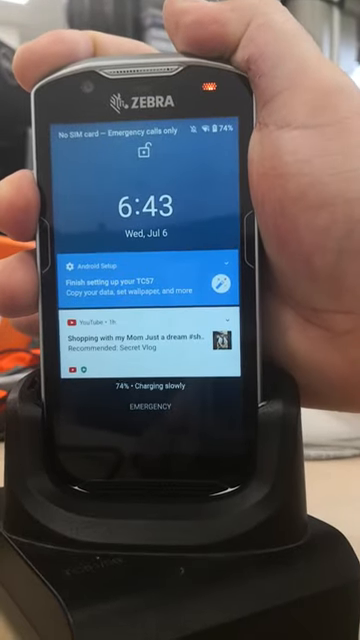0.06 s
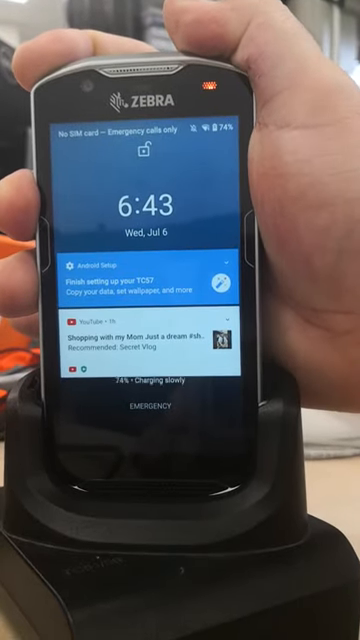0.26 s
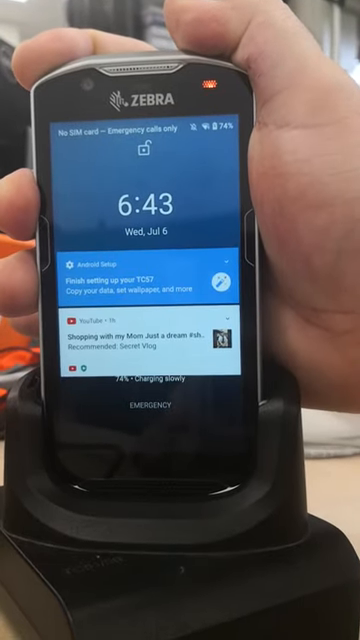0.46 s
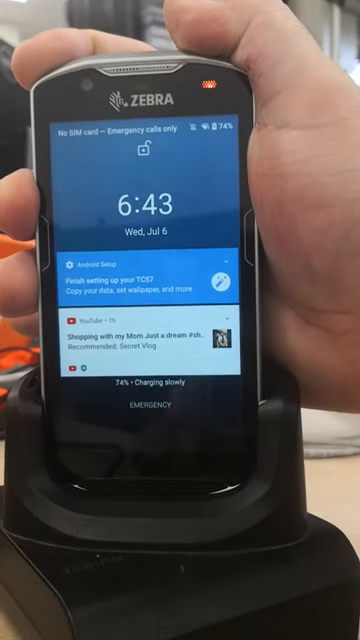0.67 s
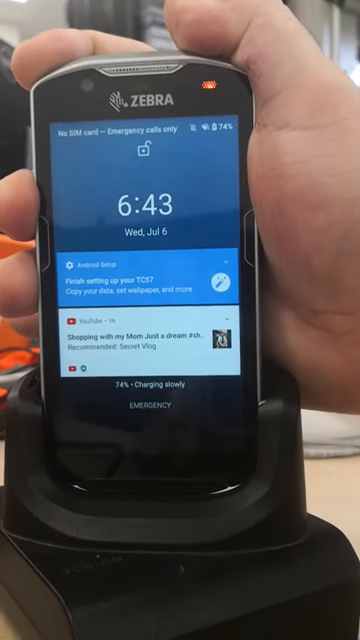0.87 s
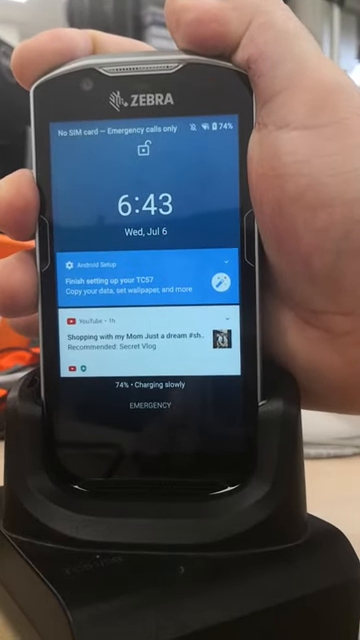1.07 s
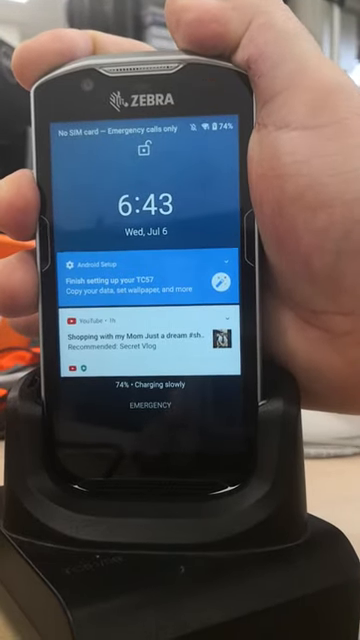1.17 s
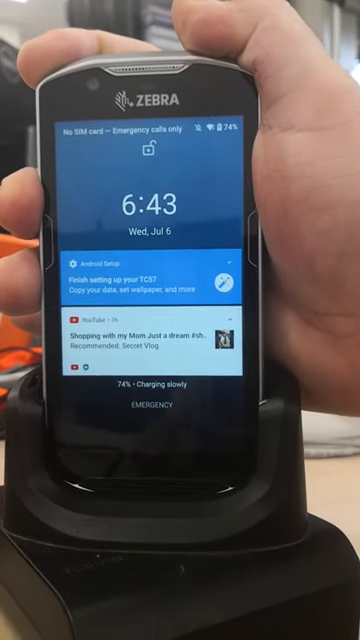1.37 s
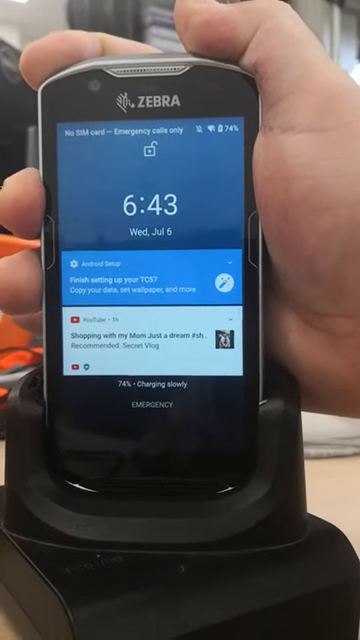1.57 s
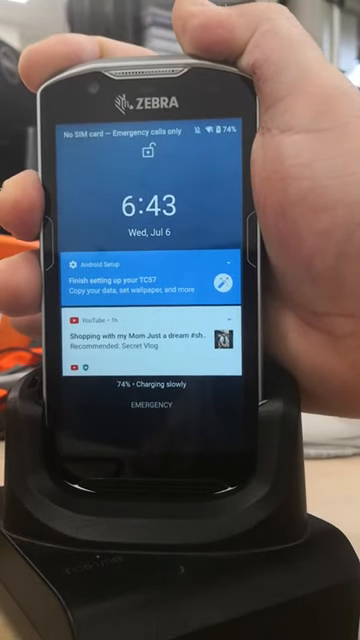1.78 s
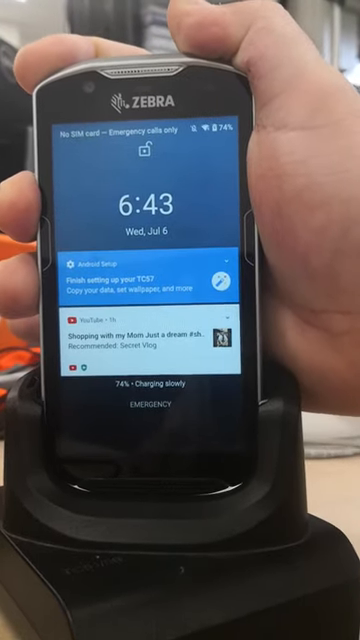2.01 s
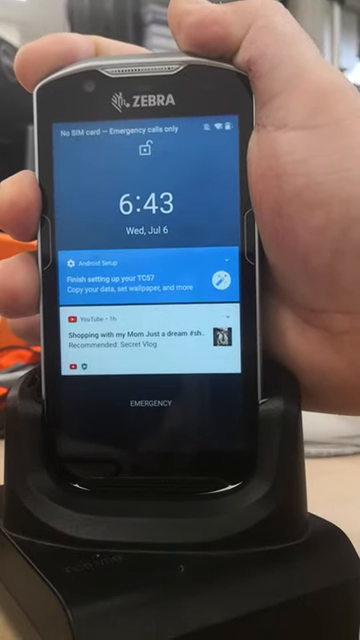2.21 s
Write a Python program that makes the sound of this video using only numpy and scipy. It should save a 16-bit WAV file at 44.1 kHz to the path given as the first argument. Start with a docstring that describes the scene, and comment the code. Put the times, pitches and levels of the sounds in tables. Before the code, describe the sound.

A phone vibrates once with a short, bright buzz in a quiet room.

```python
"""A quiet room, the microphone close to a phone in its desk cradle. The phone vibrates once.
The motor's off-centre weight spins up and shakes the body into a hum; at speed the case knocks once a
turn and rings as a bright buzz, over fluttering low overtones. A tiny tick follows. The phone sits
to the right in the stereo image; behind it, ventilation and mains hum go on."""
import sys
import numpy as np
from scipy import signal
from scipy.fft import rfft, irfft
from scipy.io import wavfile

SR = 44100
rng = np.random.default_rng(int(sys.argv[2]) if len(sys.argv) > 2 else 0)


def output_pcm(signal):
    """Save a mono or channel-first signal as 16-bit PCM at the path in sys.argv[1].

    Samples are clipped to [-1, 1] before scaling.
    """
    pcm = np.clip(np.atleast_2d(signal).T, -1, 1) * 32767
    wavfile.write(sys.argv[1], SR, np.round(pcm).astype(np.int16))


N = 99225
T = np.arange(N) / SR
FFT_SIZE = 2 ** 17
FREQ = np.arange(FFT_SIZE // 2 + 1) * SR / FFT_SIZE


def body_hum(turns):
    """The spinning weight rocks the phone in a near sine; a low mode of the desk rings on after it."""
    # shaking of the body (time [s], level [dB])
    shaking = [(.165, -89), (.187, -59), (.208, -39.5), (.222, -36.5), (.257, -36), (.275, -40.5),
               (.39, -34.5), (.6, -34.5), (.788, -34), (.795, -42.5), (.803, -74.5)]
    waver_db, waver_hz = 0.45, 59.6
    desk_hz, desk_t60_s, desk_db = 218.9, 0.38, -19.5
    waver = shape(rng.standard_normal(N), 1 / (1 + (FREQ / waver_hz) ** 2))
    hum = np.sqrt(2) * np.sin(2 * np.pi * turns) * envelope(shaking)
    hum *= undb(waver_db * waver / waver.std())
    desk = undb(desk_db) / (1 + 2j * np.pi * (FREQ - desk_hz) * desk_t60_s / np.log(1000))
    return shape(hum, 1 + desk)


def case_buzz(turns):
    """Knocks ring the case, brighter when harder; between them it scrapes and hisses."""
    # force of the knocks (time [s], level [dB])
    knock_levels = [(.21, -19), (.248, -16.5), (.27, -7), (.32, -5.5), (.35, -4), (.44, -1), (.62, 0.5),
                    (.778, 1), (.784, -11.5), (.8, -23)]
    # modes of the case (frequency [Hz], width [Hz], left [dB], right [dB])
    case_modes = [(1475, 120, -68.5, -61), (1800, 120, -82, -61), (2001, 130, -64.5, -53.5),
                  (2469, 219, -70.5, -49.5), (2730, 250, -76.5, -74.5), (2930, 990, -81, -74),
                  (4072, 180, -77.5, -61), (4475, 290, -71.5, -61.5), (4935, 100, -71, -57.5),
                  (5565, 400, -69, -68), (5720, 220, -82.5, -65.5), (6300, 190, -86.5, -65.5),
                  (6970, 130, -89, -61.5), (7450, 790, -97, -79)]
    # hiss of the rubbing case (frequency [Hz], density [dB per Hz])
    hiss_spectrum = [(800, -118), (1600, -99), (2500, -97), (3400, -104), (5000, -108), (7500, -109),
                     (8500, -118), (15000, -119)]
    dull_hz, scrape_db, rub_decay_turns = 3400, -9.5, 1.9
    force = envelope(knock_levels)
    blows = knocks(turns, jitter_s=1e-6, scatter_db=0.4) * force
    dull = shape(blows, 1 / (1 + (FREQ / dull_hz) ** 10))
    bright = (blows - dull) * np.sqrt(force)
    # rubbing follows the knocks and fades within each turn
    rubbing = 2 * np.exp(-(turns % 1) / rub_decay_turns) * force ** 0.59
    scrape = undb(scrape_db) * rng.standard_normal(N) * rubbing
    hiss = shape(rng.standard_normal((2, N)) * rubbing, colour_of(hiss_spectrum))
    return ring(dull + bright + scrape, case_modes) + hiss * sides(left_db=-6, right_db=-1.5)


def low_overtones(turns):
    """Rough low overtones that flutter, dropping out briefly about 23 times a second."""
    # low modes of phone and cradle (frequency [Hz], width [Hz], left [dB], right [dB])
    low_modes = [(465, 57, -64, -57.5), (665, 200, -67.5, -60), (860, 180, -80.5, -65),
                 (1125, 170, -77, -69), (1263, 210, -82, -71.5)]
    # swell and fade of the overtones (time [s], level [dB])
    overtone_levels = [(.2, -34), (.235, -6), (.3, -2.5), (.45, 1.5), (.66, 3), (.71, 0.5), (.78, -13),
                       (.8, -18)]
    # brief dips in the overtones (time [s], depth [dB])
    dips = [(0.247, 23), (0.289, 15.5), (0.337, 15.5), (0.381, 10.5), (.418, 14.5), (.463, 27),
            (.511, 31.5), (0.547, 25), (.596, 22.5), (0.631, 22), (0.681, 23), (0.719, 32)]
    dip_half_width_s, roughness_db = 0.0063, 16
    dip_db = sum(depth * np.exp(-((T - at) / dip_half_width_s) ** 4) for at, depth in dips)
    roughness = undb(roughness_db) * rng.standard_normal(N)
    blows = knocks(turns, jitter_s=3e-5, scatter_db=1)
    return ring(blows + roughness, low_modes) * envelope(overtone_levels) * undb(-dip_db)


def housing_ring():
    """A mode of the housing sings briefly while the motor spins up."""
    mode_hz, peak_s, half_width_s = 798, 0.2225, 0.014
    swell = np.exp(-((T - peak_s) / half_width_s) ** 2)
    return np.sqrt(2) * np.sin(2 * np.pi * mode_hz * T) * swell * sides(left_db=-71.5, right_db=-60)


def ticks():
    """Each tick is a few milliseconds of high ring with a small crack, hard right."""
    # tiny ticks (time [s], pitch [Hz], ring [dB], crack [dB])
    tick_events = [(.197, 3600, -60.5, -65), (.256, 7540, -65, -70.5), (.984, 7450, -50.5, -56)]
    ring_s, crack_s, crack_half_width_hz = 0.0026, 0.0016, 4000
    out = np.zeros(N)
    for at, hz, ring_db, crack_db in tick_events:
        age = np.maximum(T - at, 0)
        tone = undb(ring_db) * np.sin(2 * np.pi * hz * age) * np.exp(-(age / ring_s) ** 2)
        crack = undb(crack_db) * rng.standard_normal(N) * np.exp(-age / crack_s) * (T > at)
        out += tone + shape(crack, 1 / (1 + ((FREQ - hz) / crack_half_width_hz) ** 2))
    return out * sides(left_db=-29.5, right_db=0)


def room_reflections(direct):
    """The walls return a short, dull tail, different on each side."""
    delay_s, t60_s, send_db = 0.006, 0.13, -9.5
    low_cut_hz, high_cut_hz = 556, 2500
    tail = rng.standard_normal((2, N)) * undb(-60 * T / t60_s) * (T > delay_s)
    tail /= np.sqrt(np.sum(tail ** 2, axis=1, keepdims=True))
    colour = 1j * FREQ / (low_cut_hz + 1j * FREQ) / (1 + 1j * FREQ / high_cut_hz)
    return shape(undb(send_db) * direct.mean(axis=0), rfft(tail, FFT_SIZE) * colour)


def room_tone():
    """Ventilation rumble shared by both sides, wide soft hiss and a mains hum."""
    # room air (frequency [Hz], density [dB per Hz])
    air_spectrum = [(20, -93), (55, -86.5), (92, -91), (140, -94), (200, -101), (350, -105), (400, -109),
                    (690, -111.5), (1000, -107.5), (1500, -106), (2600, -109), (3300, -114), (5000, -118),
                    (9000, -125.5), (15500, -125.5)]
    centre_below_hz, vent_below_hz = 300, 1800
    mains_hz, mains_db = 121.4, -73
    colour = colour_of(air_spectrum)
    centre_share = 1 / (1 + (FREQ / centre_below_hz) ** 4)
    vent_share = (1 - centre_share) * .5 / (1 + (FREQ / vent_below_hz) ** 2)
    wide_share = 1 - centre_share - vent_share
    rumble = shape(rng.standard_normal(N), colour * np.sqrt(centre_share))
    vent = delay_left(shape(rng.standard_normal(N), colour * np.sqrt(vent_share)))
    hiss = shape(rng.standard_normal((2, N)), colour * np.sqrt(wide_share))
    mains = np.sqrt(2) * undb(mains_db) * np.sin(2 * np.pi * mains_hz * T)
    return rumble + vent * sides(left_db=-1.5, right_db=1.5) + hiss + mains


def knocks(turns, jitter_s, scatter_db):
    """One slightly uneven pulse a turn; each harmonic has an rms near 1."""
    count = int(turns[-1])
    chance = rng.standard_normal((N // 50, 2))[:count]
    at = np.interp(np.arange(count), turns, np.arange(N)) + jitter_s * SR * chance[:, 0]
    taps = at.astype(int)[:, None] + np.arange(-7, 9)
    offset = taps - at[:, None]
    # a windowed sinc lets each knock fall between samples
    pulses = np.sinc(offset) * np.sinc(offset / 8) * undb(scatter_db * chance[:, 1:])
    out = np.zeros(N)
    np.add.at(out, np.clip(taps, 0, N - 1), pulses)
    return out / np.gradient(turns) / np.sqrt(2)


def ring(drive, modes):
    """A set of modes rings after each push, as heard left and right."""
    power = sum(sides(left, right) ** 2 / (1 + (2 * (FREQ - hz) / width) ** 2) ** 2
                for hz, width, left, right in modes)
    # minimum phase: nothing rings ahead of the push
    cepstrum = irfft(np.log(power) / 2)
    cepstrum[:, 1:FFT_SIZE // 2] *= 2
    cepstrum[:, FFT_SIZE // 2 + 1:] = 0
    return shape(drive, np.exp(rfft(cepstrum)))


def delay_left(x, lag_s=0.000751):
    """The left channel lags the right by under a millisecond."""
    return shape(x, np.exp(-2j * np.pi * FREQ * np.array([[lag_s], [0]])))


def undb(db):
    """Decibels to gain."""
    return 10 ** (np.asarray(db) / 20)


def sides(left_db, right_db):
    """Gains of the left and right channels."""
    return undb([[left_db], [right_db]])


def curve(rows):
    """Straight lines through (time [s], value) rows."""
    return np.interp(T, *np.array(rows).T)


def envelope(rows, fall_db_per_s=1192):
    """Gain along (time [s], level [dB]) rows, falling fast outside them."""
    outside_s = np.maximum(rows[0][0] - T, 0) + np.maximum(T - rows[-1][0], 0)
    return undb(curve(rows) - fall_db_per_s * outside_s)


def shape(x, response):
    """Filter by a frequency response."""
    return irfft(rfft(x, FFT_SIZE) * response)[..., :N]


def colour_of(rows):
    """Response that gives white noise a spectrum of (frequency [Hz], density [dB per Hz]) rows."""
    hz, db = np.array(rows).T
    return undb(np.interp(np.log(FREQ + 1), np.log(hz), db)) * np.sqrt(SR / 2)


def scene():
    """Close up, one motor speed drives hum, buzz and overtones; the room lies behind."""
    # motor speed (time [s], rotation rate [Hz])
    motor_speed = [(.17, 149.2), (.2, 173.1), (.22, 201.4), (.24, 220.9), (.27, 228.6), (.386, 223.9),
                   (.53, 221.8), (.772, 220.5), (.8, 199.6)]
    turns = np.cumsum(curve(motor_speed)) / SR
    vibration = body_hum(turns) + case_buzz(turns) + low_overtones(turns)
    phone = delay_left(vibration + housing_ring() + ticks())
    return phone + room_reflections(phone) + room_tone()


def record(dry):
    """The recorder cuts the highest treble steeply."""
    top_hz = 15700
    return signal.sosfilt(signal.ellip(10, .1, 80, top_hz, fs=SR, output="sos"), dry)


dry = scene()
out = record(dry)
output_pcm(out)
```